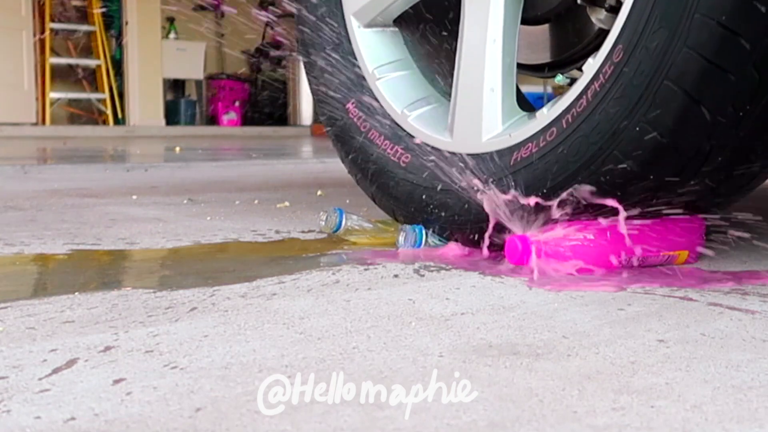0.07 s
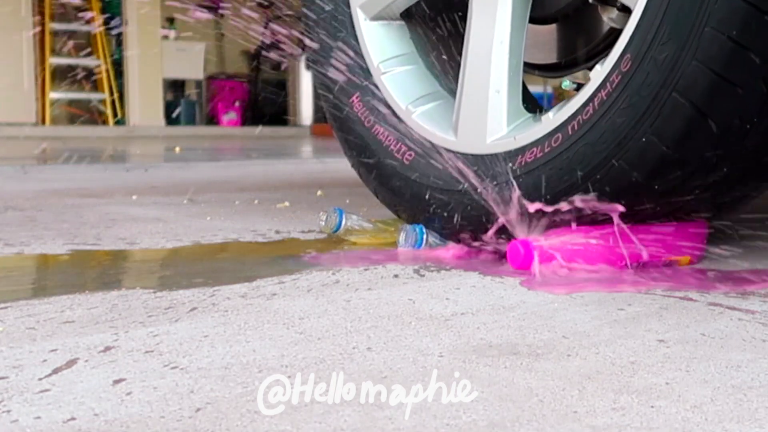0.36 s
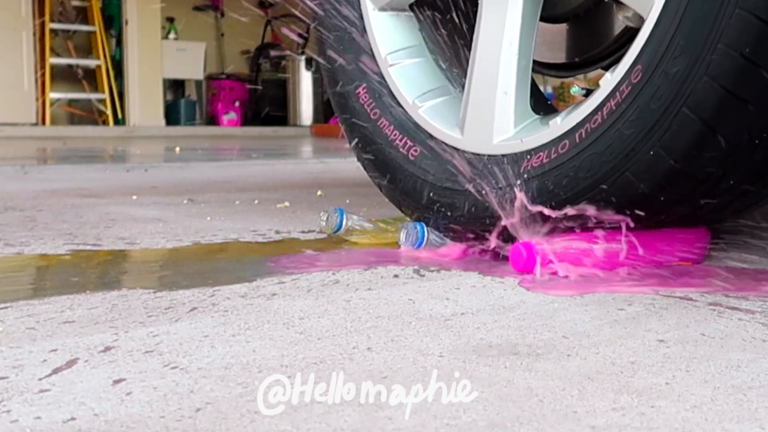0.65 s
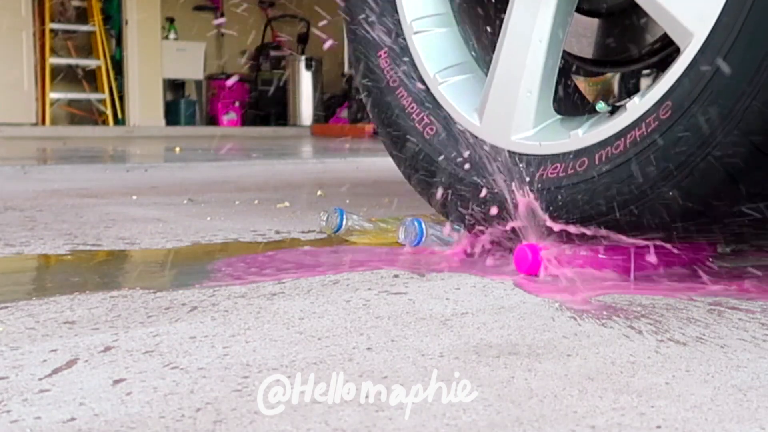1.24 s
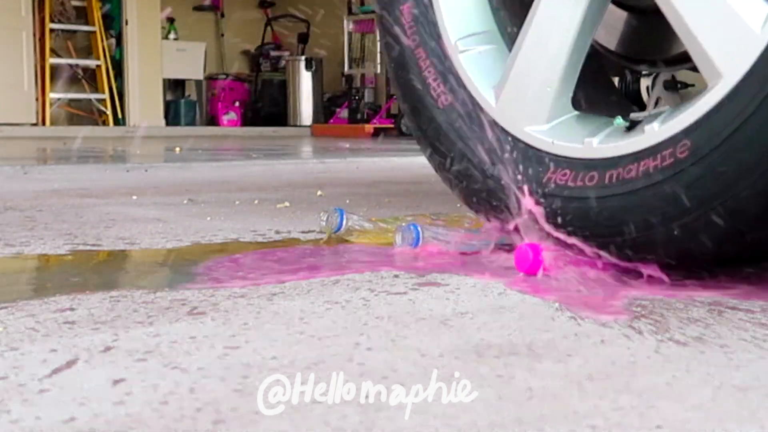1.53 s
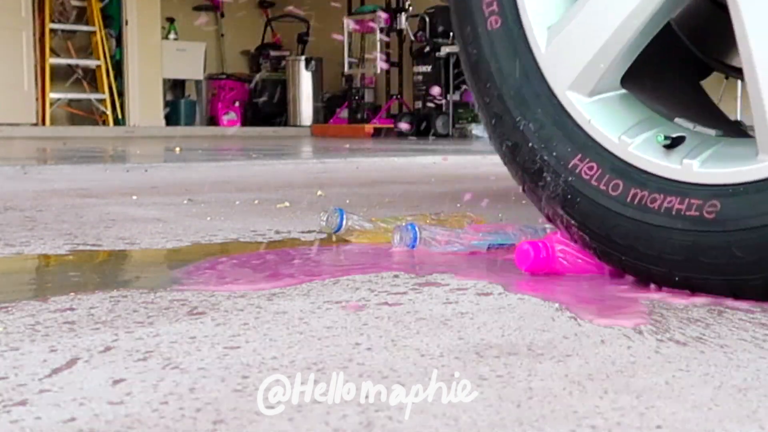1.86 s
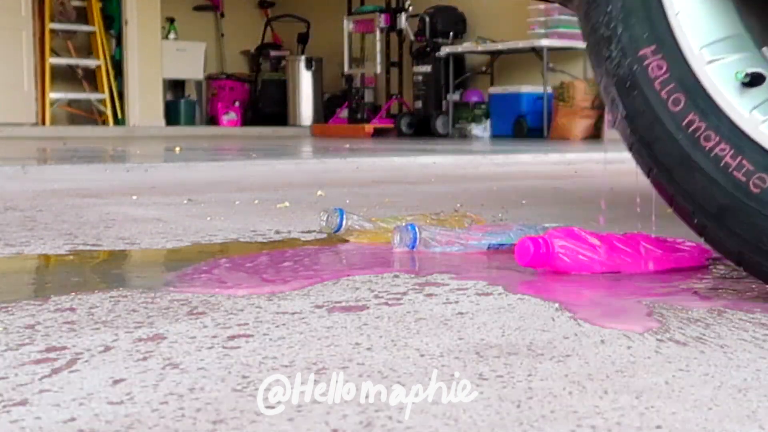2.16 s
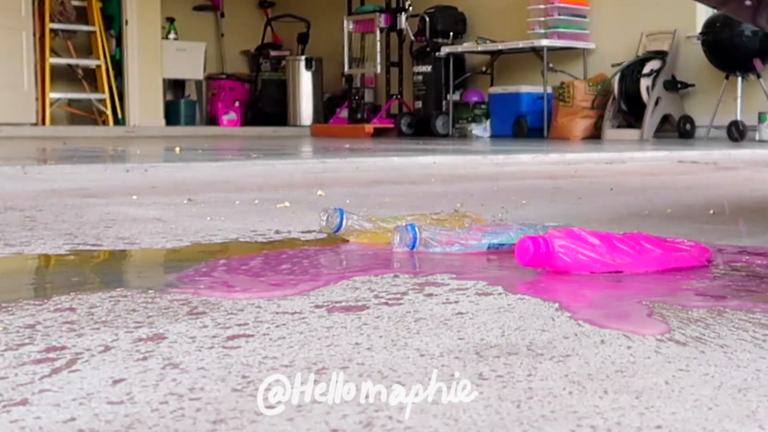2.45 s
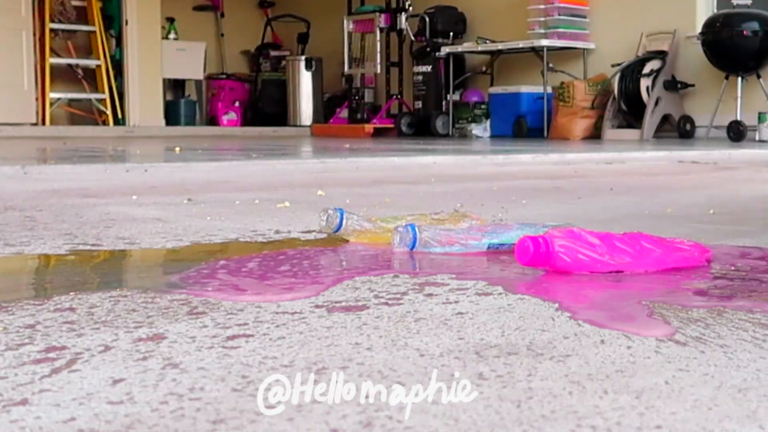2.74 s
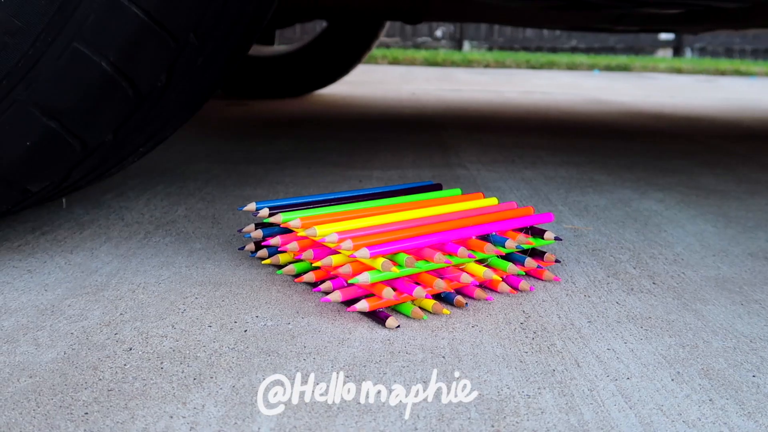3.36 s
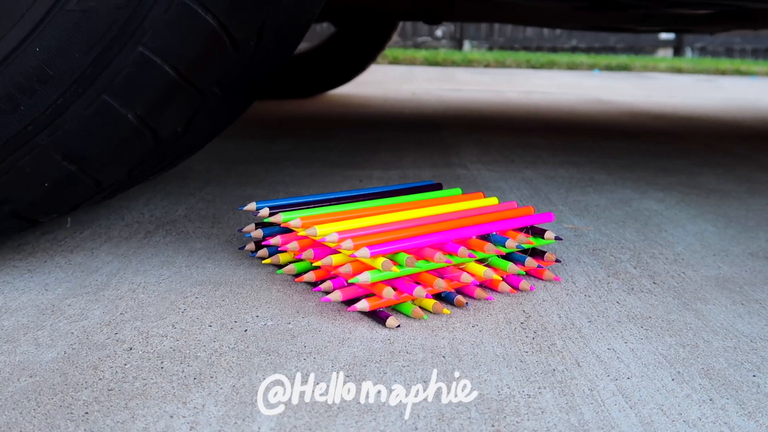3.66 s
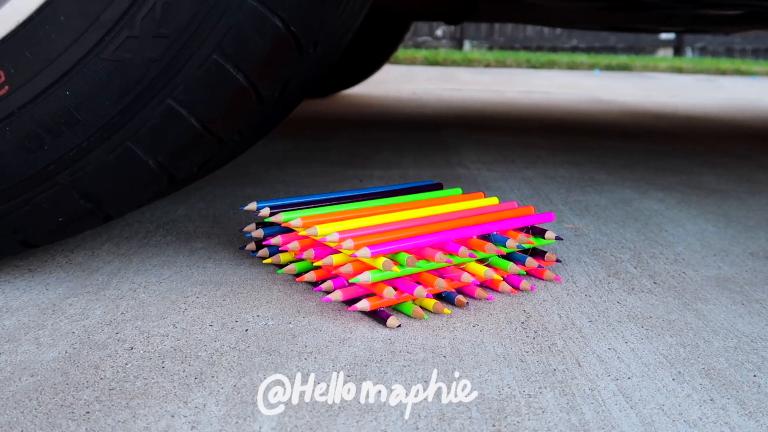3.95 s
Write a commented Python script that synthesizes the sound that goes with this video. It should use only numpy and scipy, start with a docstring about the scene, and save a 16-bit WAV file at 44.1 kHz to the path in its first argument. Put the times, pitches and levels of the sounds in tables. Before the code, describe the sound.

A close hissing spray bursts from a full plastic bottle squeezed under a slow tyre, with low thumps and hollow pops of buckling plastic. It tightens to a jet and dies away, while a car idles softly on the driveway.

```python
"""A hiss, close to the microphone: liquid and air escape the neck of a full plastic bottle as a car tyre
rolls slowly over it on a concrete driveway. A wide fan tightens to a jet, then dies in a last fizz.
The bottle thumps, and its wall buckles and springs back with hollow pops and crackles, which an open
garage faintly answers. Behind it and to the right the engine idles, nearer from about three seconds."""
import sys
import numpy as np
from scipy import signal
from scipy.fft import rfft, irfft, next_fast_len
from scipy.io import wavfile
from scipy.ndimage import uniform_filter1d, map_coordinates

SR = 44100
rng = np.random.default_rng(int(sys.argv[2]) if len(sys.argv) > 2 else 0)


def int16_out(signal):
    """Quantize to a 16-bit WAV file."""
    q = np.round(np.clip(np.atleast_2d(signal).T, -1, 1) * 32767)
    wavfile.write(sys.argv[1], SR, q.astype(np.int16))


N = 176400
TIME = np.arange(N) / SR


def amp(db):
    """Decibels to gain."""
    return 10 ** (np.asarray(db) / 20)

def unit(x):
    """Scale to rms 1."""
    return x / np.sqrt(np.mean(x ** 2) + 1e-20)

def along(points, hz):
    """Read (f/Hz, value) points on a log frequency axis."""
    f, values = np.transpose(points)
    return np.interp(np.log(hz + 1), np.log(f + 1), values)

def level(rows):
    """Gain per sample from (t/s, level/dB) rows."""
    return amp(np.interp(TIME, *np.transpose(rows)))

def after(s, fade_s=.0403):
    """A fade from 0 to 1 around time s."""
    return np.clip((TIME - s) / fade_s + .5, 0, 1)

def wobble(rate, size=N):
    """A smooth random curve, rate knots a second."""
    knots = rng.standard_normal(int(size * rate / SR) + 4)
    return map_coordinates(knots, [np.arange(size) * rate / SR])

def filtered(x, response):
    """Filter x by a function of frequency."""
    size = next_fast_len(N + SR // 2)
    return irfft(rfft(x, size) * response(np.fft.rfftfreq(size, 1 / SR)), size)[..., :N]

def add(track, s, sound):
    """Mix a sound into a track at time s."""
    part = track[int(s * SR):][:len(sound)]
    part += sound[:len(part)]

def rush(colour, alike, patchy_db, grain_db=0, grain_rate=500):
    """Stereo noise of rms 1, clumped into grains, with patches of random gain in time and frequency."""
    spectra = signal.stft(rng.standard_normal((2, N)), nperseg=512)[2]
    patches = uniform_filter1d(rng.standard_normal(spectra.shape[1:]), size=3, axis=0)
    patches = uniform_filter1d(patches, size=14, axis=1)
    pair = signal.istft(spectra * amp(patchy_db * unit(patches)), nperseg=512)[1][:, :N]
    pair *= amp(grain_db * wobble(grain_rate))
    def mid_side(hz):
        width = np.arccos(np.clip(along(alike, hz), -1, 1)) / 2
        return amp(along(colour, hz)) * [np.cos(width), np.sin(width)]
    mid, side = filtered(pair, mid_side)
    return unit(np.array([mid + side, mid - side]))

def crunch(colour, size, grain_db, grain_rate):
    """A run of uneven creases, each the shortest (minimum-phase) click of this colour; rms 1."""
    cepstrum = irfft(np.log(amp(along(colour, np.fft.rfftfreq(2048, 1 / SR)))))
    cepstrum[1:1024] *= 2
    cepstrum[1025:] = 0
    click = irfft(np.exp(rfft(cepstrum)))
    creases = rng.standard_normal(size) * amp(grain_db * wobble(grain_rate, size))
    return unit(signal.fftconvolve(creases, click)[:size])


# Spectra of the three stages of hiss at the neck: f/Hz, relative level/dB
FAN_SPECTRUM = [(1180, -28), (2000, -6), (3000, -7), (5050, -5), (5500, -2), (9320, -5), (12000, -3.5),
                (14600, -10.5), (15800, -23)]
JET_SPECTRUM = [(1100, -27), (1600, -14.5), (2200, -3.5), (3200, -3.5), (4600, -5.5), (6600, 2),
                (8150, -.5), (12000, -10), (15800, -19.5)]
FIZZ_SPECTRUM = [(900, -21), (1700, -7), (2500, 2.5), (3500, -10.5), (5400, -9), (7900, 0), (10500, -3.5),
                 (12000, -14.5), (15800, -25)]
# Likeness of the hiss at the two microphones: f/Hz, correlation
SPRAY_LIKENESS = [(2500, .998), (4200, 1), (7000, 0.69), (14000, .54)]
# The spray climbs with the squeeze and drops as the bottle gives way: t/s, level/dB
SPRAY_STRENGTH = [(0, -31.5), (.5, -25), (.572, -26.5), (.6, -34), (.695, -34.5), (.718, -30),
                  (.785, -30.5), (.825, -32), (.88, -27.5), (.975, -24), (1.2, -25), (1.478, -23),
                  (1.5, -32.5), (1.765, -37.5), (1.835, -52), (1.92, -66)]

def spray(fan_end_s=.577, jet_end_s=1.495, notch_hz=8680, notch_width_hz=230, notch_db=-8):
    """Liquid and air forced out close to the microphone: fan, jet and fizz, each broken into droplets."""
    tight, spent, stopped = after(fan_end_s), after(jet_end_s), after(SPRAY_STRENGTH[-1][0])
    fan = rush(FAN_SPECTRUM, SPRAY_LIKENESS, patchy_db=1.76, grain_db=.85, grain_rate=1200)
    jet = rush(JET_SPECTRUM, SPRAY_LIKENESS, patchy_db=3.2, grain_db=1.4, grain_rate=700)
    jet *= amp(.8 * wobble(55))  # the jet spits unevenly
    fizz = rush(FIZZ_SPECTRUM, SPRAY_LIKENESS, patchy_db=3, grain_db=2.6, grain_rate=300)
    hiss = np.sqrt(1 - tight) * fan
    hiss += np.sqrt(tight * (1 - spent)) * jet
    hiss += np.sqrt(spent * (1 - stopped)) * fizz
    treble_dip = lambda hz: amp(notch_db * np.exp(-((hz - notch_hz) / notch_width_hz) ** 2))
    return filtered(level(SPRAY_STRENGTH) * hiss, treble_dip)


# Liquid moving inside the bottle: t/s, level/dB
CHURN_LEVEL = [(0, -43.5), (.3, -40.5), (.52, -32.5), (.64, -45.5), (.82, -61), (1.02, -46), (1.3, -43),
               (1.52, -36.5), (1.62, -45.5), (1.7, -38), (1.88, -37.5), (1.95, -53)]
# Its hollow spectrum: f/Hz, relative level/dB
CHURN_SPECTRUM = [(70, -35), (185, -8.5), (450, -10), (660, 0.5), (950, -7), (1500, -14.5), (8000, -63.5)]
# Almost the same at both microphones: f/Hz, correlation
CHURN_LIKENESS = [(1000, .999)]

def churn():
    """Liquid churns in the body of the bottle, close and central."""
    slosh = rush(CHURN_SPECTRUM, CHURN_LIKENESS, patchy_db=2.5, grain_db=3.5, grain_rate=140)
    return level(CHURN_LEVEL) * (1 - after(CHURN_LEVEL[-1][0])) * slosh


# Engine hum, farther off and nearer: multiple of the firing rate, rms level/dB
HUM_FAR = [(1, -53), (2, -57.5), (3, -61.5)]
HUM_NEAR = [(1, -48), (2, -50.5), (3, -58.5), (6, -56)]
# Noise from the engine bay: t/s, level/dB
BAY_LEVEL = [(1.95, -47.5), (2.45, -46.5), (2.87, -49), (3.05, -45), (3.12, -42), (3.5, -42.5), (3.98, -44)]
# Its spectrum: f/Hz, relative level/dB
BAY_SPECTRUM = [(45, -25.5), (77, -3), (140, -8), (400, -13), (650, -11), (900, -16.5), (1700, -16.5),
                (2700, -29.5), (7600, -39.5), (14000, -68)]
# Likeness of the car at the two microphones: f/Hz, correlation
CAR_LIKENESS = [(100, .999), (1300, 0.93), (7000, 0.17)]

def engine(firing_hz=37, nearer_s=3.09):
    """The idle behind the bottle: harmonics of the firing rate, and bay noise that pulses with it."""
    phase = 2 * np.pi * np.cumsum(firing_hz * (1 + .01198 * wobble(3.7))) / SR
    def hum(orders):
        return np.sqrt(2) * sum(
            amp(db + .43 * wobble(4.5)) * np.sin(order * phase + rng.uniform(0, 2 * np.pi))
            for order, db in orders)
    noise = rush(BAY_SPECTRUM, CAR_LIKENESS, patchy_db=1.5, grain_db=1.2, grain_rate=200)
    bay = level(BAY_LEVEL) * (1 + .05 * np.sin(phase)) * noise
    near = after(nearer_s)
    return bay + (1 - near) * hum(HUM_FAR) + near * hum(HUM_NEAR)


# Low thumps of the squeezed bottle: t/s, relative level/dB
SQUEEZES = [(.096, -23), (0.173, -25), (0.272, -22), (.411, -20.5), (.481, -21), (.533, -26)]
# Plastic crushed under the rubber: f/Hz, relative level/dB
CRUSH_SPECTRUM = [(60, -22), (110, -4.5), (220, 0), (400, -9.5), (650, -8.5), (1500, -32), (5000, -45.5)]

def thumps(swing_hz=103, swing_t60_s=.1, crush_t60_s=.13, attack_s=.002):
    """The tyre bears down on the bottle: an unsteady low swing and a ragged crush of plastic."""
    out, t = np.zeros(N), np.arange(SR // 4) / SR
    for s, db in SQUEEZES:
        cycles = swing_hz * np.cumsum(1 + .15 * wobble(150, len(t))) / SR
        swing = np.sin(2 * np.pi * cycles) * amp(-60 * t / swing_t60_s)
        crush = crunch(CRUSH_SPECTRUM, len(t), grain_db=4, grain_rate=250)
        crush *= amp(-2.5 - 60 * t / crush_t60_s)
        add(out, s, amp(db) * (swing + crush) * (1 - np.exp(-t / attack_s)))
    return out


# Liquid sputtering through the neck: t/s, level/dB
SPUTTER_LEVEL = [(.14, -54), (.23, -35), (.36, -33.5), (.57, -31), (.66, -47.5), (.82, -60), (1.1, -52),
                 (1.16, -38.5), (1.25, -50), (1.6, -53.5), (1.8, -42.5), (1.92, -57)]
# Its wandering resonance: t/s, f/Hz
NECK_RESONANCE = [(.22, 1500), (.32, 1950), (.42, 1600), (.6, 1301), (1.16, 1099), (1.68, 1900),
                  (1.82, 1148)]

def sputter(width_hz=480, grain_db=2.5):
    """Liquid sputters at the neck, close up: a grainy band of noise that follows the resonance."""
    noise = filtered(rng.standard_normal((2, N)), lambda hz: 1 / (1 + (hz / width_hz) ** 3))
    phase = 2 * np.pi * np.cumsum(np.interp(TIME, *np.transpose(NECK_RESONANCE))) / SR
    band = noise[0] * np.cos(phase) + noise[1] * np.sin(phase)
    spits = unit(band * amp(grain_db * wobble(680)))
    return level(SPUTTER_LEVEL) * (1 - after(SPUTTER_LEVEL[-1][0])) * spits


# The bottle wall buckles: t/s, relative level/dB, f/Hz, t60/s, crack against ring/dB
BUCKLES = [(.185, -25, 660, 0.046, -20.5), (.438, -15.5, 1230, 0.012, -7), (.499, -21, 760, .014, -3),
           (0.5354, -5, 1120, 0.0034, -2), (.541, -13, 620, 0.024, -22.5), (.573, -3, 1270, 0.013, -5),
           (.891, -28.5, 638, 0.034, 8.5), (1.118, -7.5, 845, 0.011, -7), (1.127, -18, 1000, .012, -3),
           (1.134, -13, 794, 0.011, -8), (1.334, -17, 610, 0.028, 1), (1.481, -1, 625, 0.02, -2.5),
           (1.699, -26.5, 740, 0.03, -12), (1.851, -23, 491, 0.038, -10), (1.884, -16.5, 520, 0.02, -11.5),
           (2.159, -19, 635, 0.028, -15), (2.918, -25, 1520, 0.013, -5), (2.9225, -20.5, 734, 0.019, -13)]
# Modes of the wall: multiple of the pitch, relative level/dB
RING_MODES = [(1, 5.5), (1.23, -10), (.78, -6), (2.05, -15), (2.8, -16)]
# Spectrum of each crack: f/Hz, relative level/dB
CRACK_SPECTRUM = [(200, -24), (480, -3), (900, 4), (1800, 5), (2700, -5), (4200, -18), (5500, -37),
                  (15000, -73)]
# The last pops come from the left: t/s, left minus right/dB
BUCKLE_PAN = [(2.2, 0.55), (2.9, 5.5)]
# Reflections off the wheel and underbody: delay/s, gain
CAR_ECHOES = [(.0052, 0.09), (.0085, 0.23), (.0118, 0.07), (.0165, .07)]

def pops(ring_attack_s=.0014, crack_attack_s=.0005, crack_t60_s=.009, crumple_t60_s=.051):
    """Each buckle, close by, is a crack, a short hollow ring and a crumple, echoed under the car."""
    out, t = np.zeros((2, N)), np.arange(SR // 8) / SR
    sag = .15 * np.exp(-t / .0018)  # the ring starts sharp and settles
    crumple = amp(-19 - 60 * t / crumple_t60_s)  # small creases follow each crack
    crack_fade = (amp(-60 * t / crack_t60_s) + crumple) * (1 - np.exp(-t / crack_attack_s))
    for s, db, hz, t60, crack_db in BUCKLES:
        waver = .062 * wobble(500, len(t))  # the pitch wavers as the wall creases
        phase = 2 * np.pi * hz * np.cumsum(1 + sag + waver) / SR
        ring = sum(amp(mode_db + rng.normal()) * np.sin(ratio * phase) for ratio, mode_db in RING_MODES)
        ring *= amp(-60 * t / t60) * (1 - np.exp(-t / ring_attack_s))
        crack = crack_fade * crunch(CRACK_SPECTRUM, len(t), grain_db=2.5, grain_rate=600)
        pop = amp(db + 1) * (ring / np.abs(ring).max() + amp(crack_db) * crack / np.abs(crack).max())
        pan_db = np.interp(s, *np.transpose(BUCKLE_PAN))
        add(out[0], s, amp(pan_db / 2) * pop)
        add(out[1], s, amp(-pan_db / 2) * pop)
    echoes = lambda hz: sum(gain * np.exp(-2j * np.pi * hz * delay) for delay, gain in CAR_ECHOES)
    return filtered(out, lambda hz: 1 + echoes(hz))


def bottle_hum(start_s=1.51, end_s=1.88, pitch_hz=183, width_hz=28, db=-47.5):
    """The nearly empty bottle hums faintly: noise in one narrow, hollow resonance."""
    hum = filtered(rng.standard_normal(N), lambda hz: 1 / (1 + ((hz - pitch_hz) / width_hz) ** 2))
    return amp(db) * (after(start_s) - after(end_s)) * unit(hum)


# Plastic and grit: t/s, relative level/dB, f/Hz, rise and fall time/s, width/Hz
CRINKLES = [(1.862, -39.5, 5200, 0.0042, 900), (2.47, -41.5, 11300, 0.0028, 1500),
            (2.558, -55, 7950, 0.011, 5500), (2.869, -59, 10500, 0.0044, 6000),
            (3.367, -54, 8500, .013, 6000)]

def crinkles(grain_db=3, grain_rate=500):
    """Small crinkles of plastic and grit, each a soft swell of bright grainy noise."""
    out, t = np.zeros(N), np.arange(SR // 8) / SR
    middle, freqs = t.mean(), np.fft.rfftfreq(len(t), 1 / SR)
    for s, db, hz, fade_s, width_hz in CRINKLES:
        band = 1 / (1 + ((freqs - hz) / width_hz) ** 2) ** 2
        grains = rng.standard_normal(len(t)) * amp(grain_db * wobble(grain_rate, len(t)))
        crinkle = unit(irfft(rfft(grains) * band, len(t)))
        add(out, s - middle, amp(db - 8.5) * crinkle * np.exp(-np.abs(t - middle) / fade_s))
    return out


# The tyre's bumps and scuffs on the driveway: t/s, level/dB, half length/s
TYRE_BUMPS = [(3.232, -38, .016), (3.52, -39.5, 0.015)]
TYRE_SCUFFS = [(3.242, -37, 0.015), (3.455, -44, .03)]
# Their spectra: f/Hz, relative level/dB
BUMP_SPECTRUM = [(50, -20), (105, 0), (250, -5), (900, -53)]
SCUFF_SPECTRUM = [(300, -12), (700, 4), (1650, 8), (2600, -18), (10000, -70)]

def tyre():
    """The tyre rumbles as it settles and scuffs on the concrete, in short swells of noise."""
    swells = lambda rows: sum(amp(db) * np.exp(-((TIME - s) / half) ** 2) for s, db, half in rows)
    rumble = rush(BUMP_SPECTRUM, CAR_LIKENESS, patchy_db=.5)
    scrape = rush(SCUFF_SPECTRUM, CAR_LIKENESS, patchy_db=1.5, grain_db=3, grain_rate=600)
    return swells(TYRE_BUMPS) * rumble + swells(TYRE_SCUFFS) * scrape


# Reverberation of the open garage: f/Hz, t60/s
GARAGE_DECAY = [(200, .3), (1200, 0.33), (4000, 0.11), (12000, 0.066)]

def garage(sound, side_db=-16):
    """The open garage answers with a short, nearly central tail."""
    hz, t, spectra = signal.stft(rng.standard_normal((2, SR // 2)), SR, nperseg=256)
    decay = amp(-60 * t / along(GARAGE_DECAY, hz)[:, None])
    mid, side = signal.istft(spectra * decay, SR, nperseg=256)[1]
    tail = np.array([mid + amp(side_db) * side, mid - amp(side_db) * side]) / np.linalg.norm(mid)
    return signal.fftconvolve(sound[None], tail, axes=1)[:, :N]


# The car is louder at the right microphone: f/Hz, left minus right/dB
CAR_BALANCE = [(380, -0.36), (2000, -4.5), (7000, -0.5)]

def scene(garage_db=-17.5, left_lag_s=.00003):
    """From the microphones: the bottle close, its spray slightly left, the car behind and to the right."""
    sides = np.array([[.5], [-.5]])
    plastic = pops() + thumps() + crinkles()
    reverb = amp(garage_db) * garage(plastic.mean(axis=0))
    liquid = spray() * amp(.5 * sides) + sputter() + churn() + bottle_hum()
    def to_the_right(hz):
        return amp(along(CAR_BALANCE, hz) * sides) * np.exp(-2j * np.pi * hz * left_lag_s * sides)
    car = filtered(engine() + tyre(), to_the_right)
    return plastic + reverb + liquid + car


def record(dry, ceiling=.88, top_hz=15850):
    """The recorder rounds off the highest peaks and keeps nothing above its band limit."""
    rounded = dry / (1 + np.abs(dry / ceiling) ** 6) ** (1 / 6)
    return filtered(rounded, lambda hz: np.clip((top_hz - hz) / 400 + .5, 0, 1))


dry = scene()
out = record(dry)
int16_out(out)
```